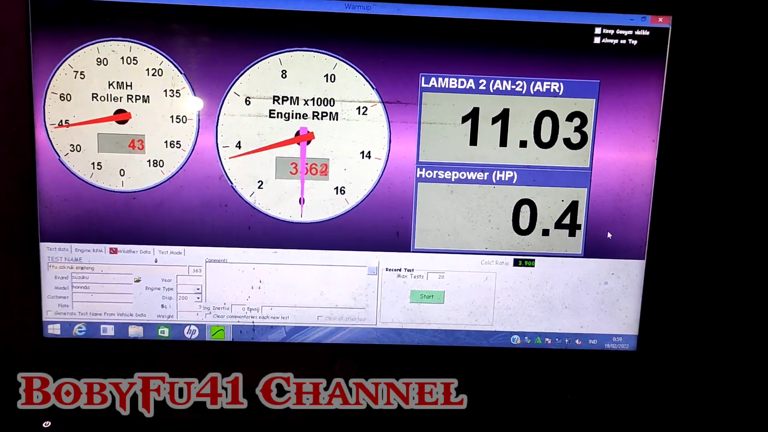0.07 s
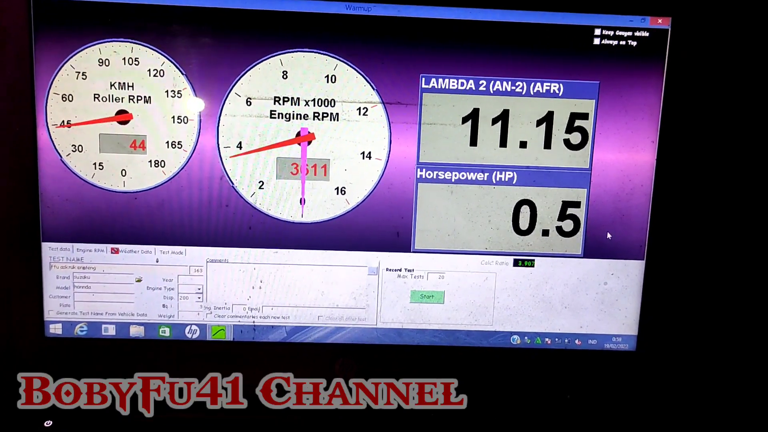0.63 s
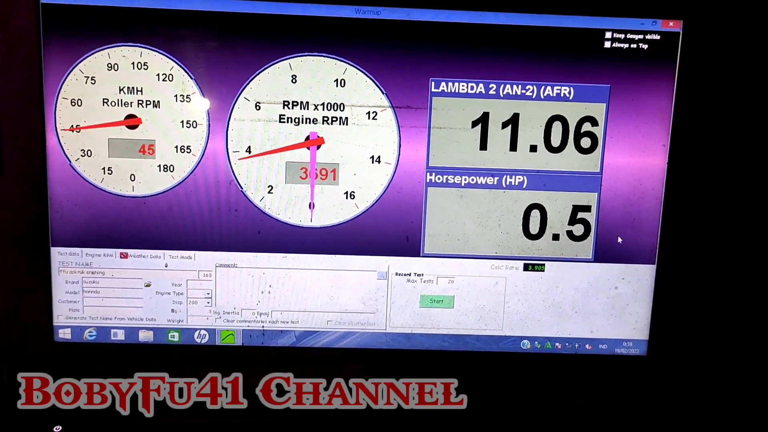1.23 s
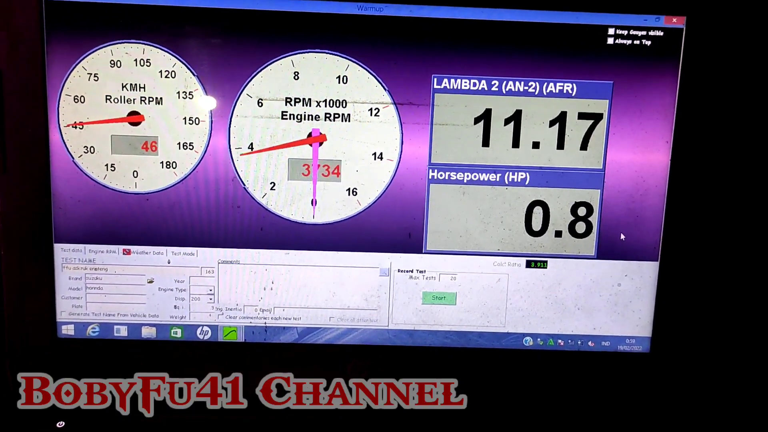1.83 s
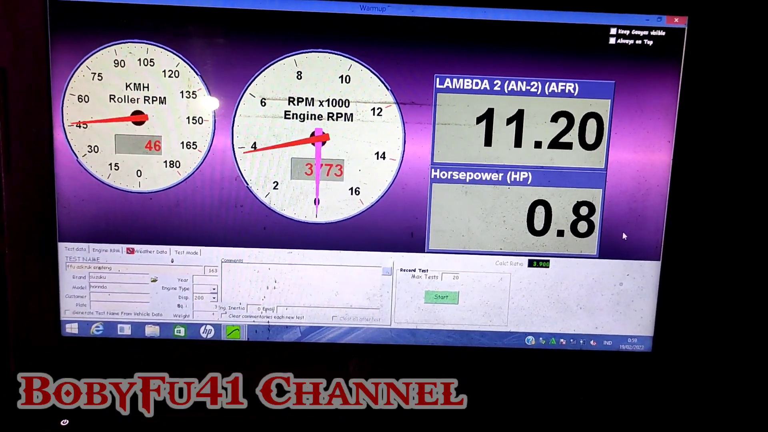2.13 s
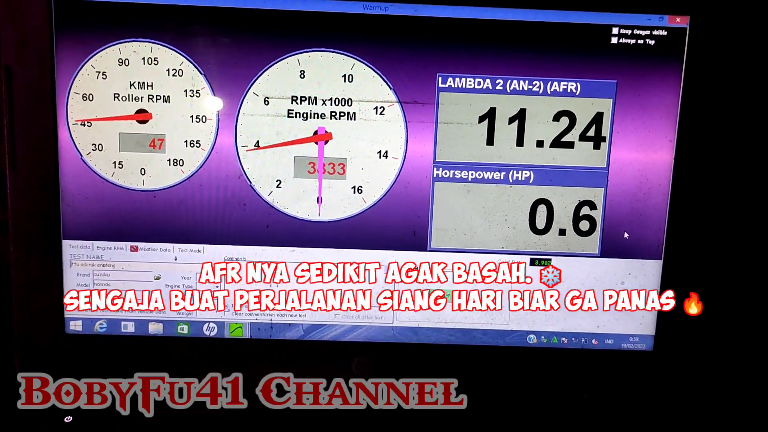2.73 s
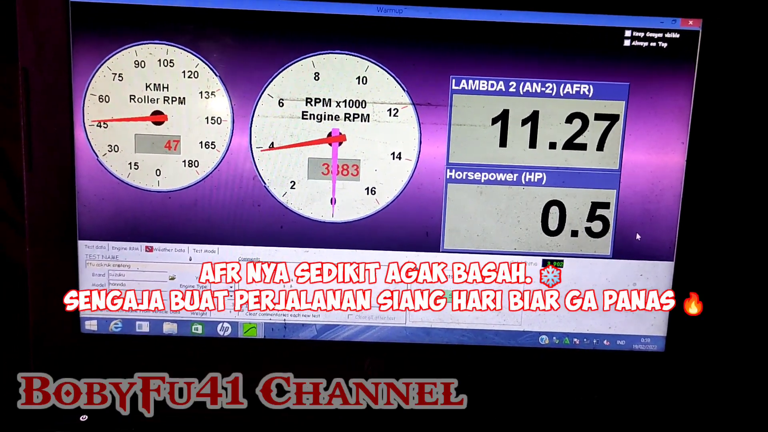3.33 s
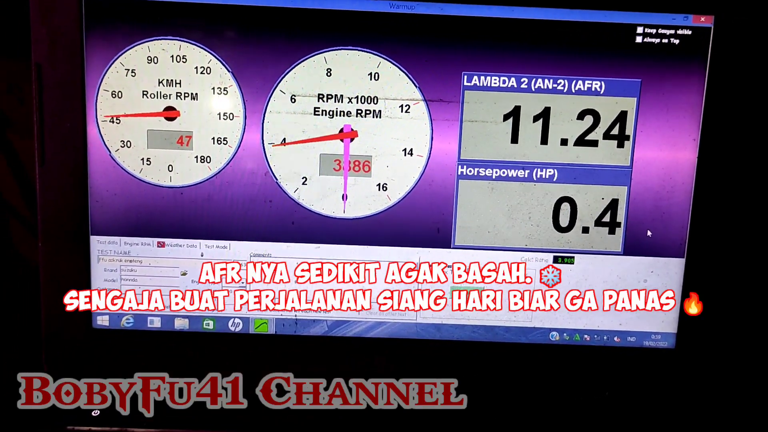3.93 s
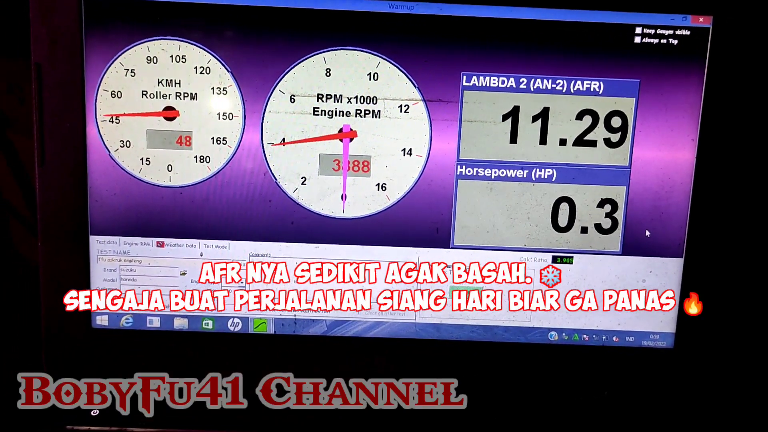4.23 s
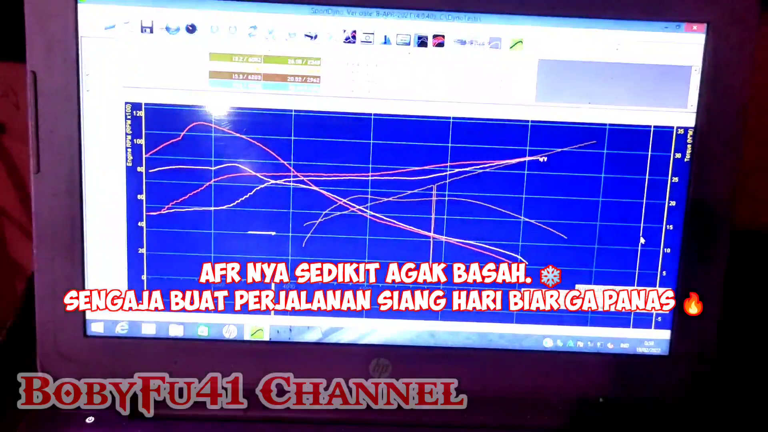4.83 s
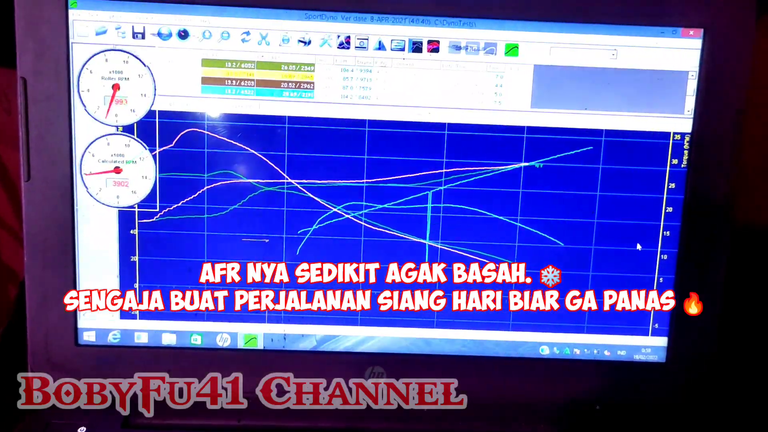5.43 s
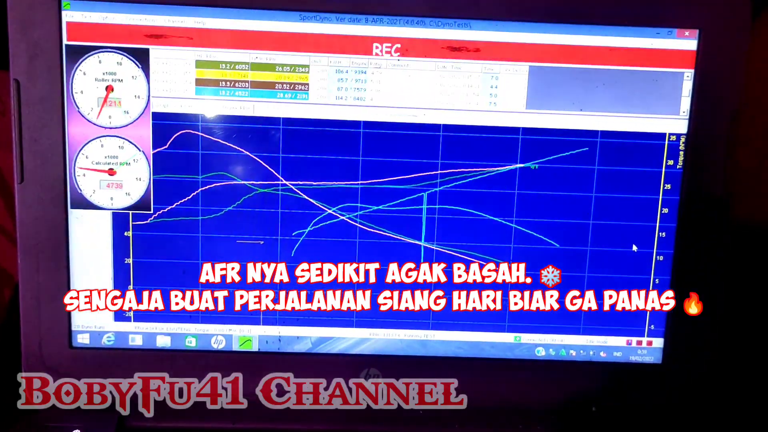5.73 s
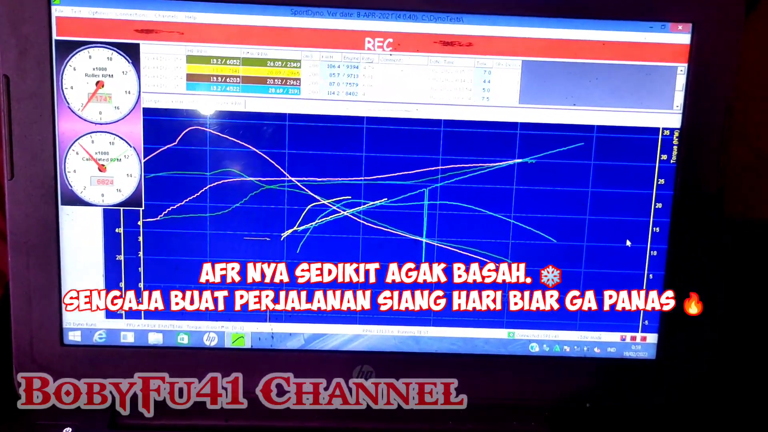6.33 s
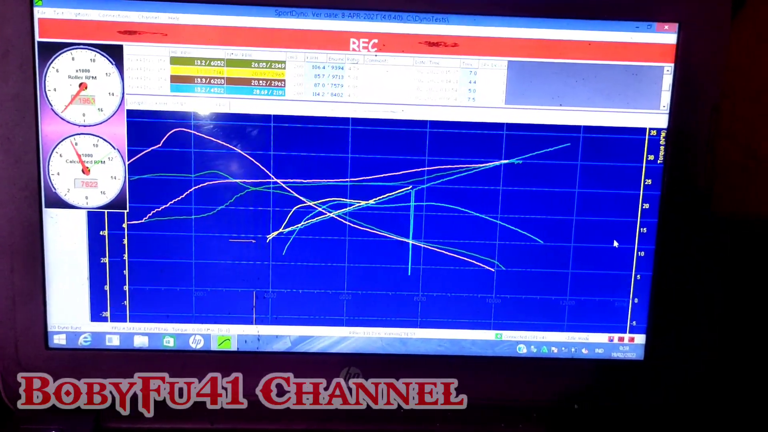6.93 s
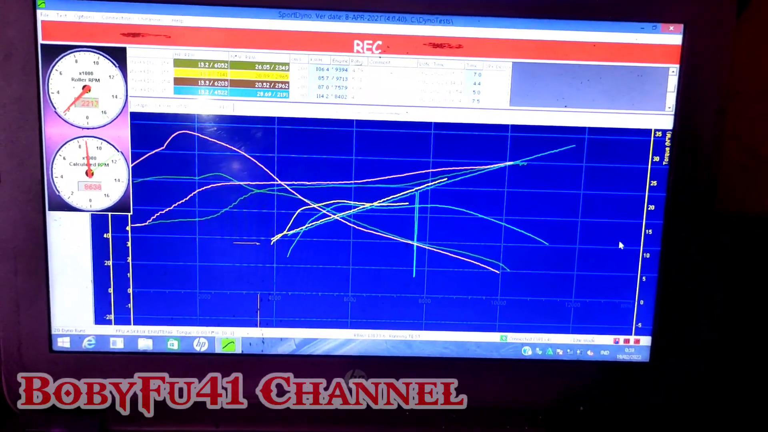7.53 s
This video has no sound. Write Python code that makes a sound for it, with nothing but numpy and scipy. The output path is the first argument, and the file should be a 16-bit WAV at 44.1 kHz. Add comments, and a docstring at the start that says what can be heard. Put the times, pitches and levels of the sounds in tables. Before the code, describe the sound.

Inside a small, boomy workshop, a motorcycle engine cruises on a roller with an even, soft exhaust thud, light ticking and chain noise. About four seconds in it is given full throttle and grows much louder, its revs rising without a break to the end. Air hisses at the intake, gas rasps from the pipe, and the microphone distorts a little on the loud part.

```python
"""Motorcycle on a dynamometer

A single-cylinder four-stroke cruises in a small workshop, then pulls at full throttle.
Each firing sends a pressure pulse and a rush of gas out of the pipe; the harmonics of this
pulse train climb through the fixed resonances of pipe and room. Valves tick, chain, roller
and intake hiss, and the microphone overloads during the pull."""
import sys
import numpy as np
from scipy import signal
from scipy.fft import rfft, irfft
from scipy.io import wavfile

SR = 44100
rng = np.random.default_rng(int(sys.argv[2]) if len(sys.argv) > 2 else 0)


def bounce(signal):
    """Save signal as a 16-bit WAV file at the path given by the first command-line argument."""
    frames = np.transpose(np.atleast_2d(signal))
    limited = np.clip(frames, -1, 1)
    pcm = np.round(limited * 32767).astype(np.int16)
    wavfile.write(sys.argv[1], SR, pcm)


N = 339129
TIME = np.arange(N) / SR
FFT_SIZE = 32768
FREQS = np.maximum(np.fft.rfftfreq(FFT_SIZE, 1 / SR), 1)


def undb(db):
    """Amplitude ratio: a factor of ten for every 20 dB."""
    return 10 ** (np.asarray(db) / 20)


def slope(points):
    """Spectral envelope in dB, interpolated over log frequency."""
    hz, db = np.transpose(points)
    return np.interp(np.log(FREQS), np.log(hz), db)


def resonances(modes):
    """Modal response in dB: each mode adds a Lorentzian peak or dip."""
    return sum(db / (1 + (2 * (FREQS - hz) / width) ** 2) for hz, width, db in modes)


def ring(x, response_db):
    """Minimum-phase filtering: peaks in the response ring on after each pulse."""
    half = FFT_SIZE // 2
    cepstrum = irfft(np.log(undb(response_db)))
    cepstrum[1:half] *= 2
    cepstrum[half + 1:] = 0
    impulse_response = irfft(np.exp(rfft(cepstrum)))[:half]
    return signal.oaconvolve(x, impulse_response)[:N]


def pulses(cycles, phase, jitter_ms, scatter_db):
    """Quasi-periodic impulse train: one click a cycle, varying in timing and size."""
    turns = np.arange(int(cycles[-1])) + phase
    chance = rng.standard_normal((len(turns), 2))
    onset_s = np.interp(turns, cycles, TIME) + chance[:, 0] * jitter_ms / 1000
    size = undb(scatter_db * chance[:, 1])
    place = np.clip(onset_s * SR, 0, N - 2)
    whole, part = place.astype(int), place % 1
    return np.bincount(whole, size * (1 - part), N) + np.bincount(whole + 1, size * part, N)


def walls(x, wet_db, t60_s, above_hz):
    """Reverberation: above the standing waves, dense wall reflections smear each pulse."""
    t = TIME[:SR // 2]
    build_up = 1 - np.exp(-t / 0.0095)
    tail = rng.standard_normal(len(t)) * undb(-60 * t / t60_s) * build_up
    highpass = signal.butter(2, above_hz, "high", fs=SR, output="sos")
    tail = signal.sosfilt(highpass, tail / np.linalg.norm(tail))
    return x + undb(wet_db) * signal.fftconvolve(x, tail)[:N]


# Noise spectrum of chain, tyre and roller: (frequency [Hz], relative level [dB])
ROLLING_SPECTRUM = [(25, -27), (100, -23.5), (400, -24.5), (800, -30), (1200, -38.5), (2500, -35.5),
                    (3300, -41), (4300, -49), (5500, -47), (7300, -43.5)]
def chain_and_roller(cycles):
    """Amplitude modulation: rolling noise swells as the chain is tugged once a crank turn."""
    tug = undb(1.9 * np.sin(4 * np.pi * cycles))
    return ring(rng.standard_normal(N) * tug, slope(ROLLING_SPECTRUM))


# Spectrum of a valve tick: (frequency [Hz], relative level [dB])
TICK_SPECTRUM = [(300, -50.5), (1500, -24.5), (2500, -20.5), (4300, -44), (7000, -36)]
def valves(cycles, level_db, decay_s):
    """Impact noise: valves seat twice a cycle, each in an exponentially decaying burst."""
    impacts = sum(pulses(cycles, phase, jitter_ms=0.3, scatter_db=2.5) for phase in (0.22, 0.56))
    envelope = signal.lfilter([1], [1, -np.exp(-1 / (decay_s * SR))], impacts)
    return undb(level_db) * ring(envelope * rng.standard_normal(N), slope(TICK_SPECTRUM))


def intake(cycles, throttle, hiss_db, centre_hz, width_hz):
    """Flow noise: air hisses past the slide as soon as it lifts, in one gulp a cycle."""
    gulp = 0.5 + np.cos(np.pi * cycles) ** 2
    air = rng.standard_normal(N) * gulp * np.tanh(throttle / 0.16)
    rolloff_db = 20 * np.log10(1 + (2 * (FREQS - centre_hz) / width_hz) ** 2)
    return ring(air, hiss_db - rolloff_db)


# Spectrum of the escaping gas: (frequency [Hz], relative level [dB])
GAS_SPECTRUM = [(30, -12), (120, -23.5), (450, -13.5), (900, -17), (1800, -9), (3000, -12.5), (4500, -20.5),
                (7000, -33)]
def gas_rush(cycles, strength):
    """Turbulence: a rush of gas follows each firing and dies away over the cycle."""
    blowdown = np.exp(-(cycles % 1) / 0.28)
    return ring(rng.standard_normal(N) * blowdown * strength, slope(GAS_SPECTRUM))


# Exhaust pulse on a light throttle: (frequency [Hz], relative level [dB])
THUD_SPECTRUM = [(30, -42), (60, -40.5), (120, -24.5), (250, -34.5), (400, -29), (550, -45), (800, -49.5),
                 (1100, -67.5), (2000, -74.5), (5000, -84.5)]
def thud(cycles, strength):
    """Periodic excitation: soft pressure pulses give mainly low harmonics."""
    firings = pulses(cycles, 0, jitter_ms=0.082, scatter_db=0.7)
    return ring(firings * strength, slope(THUD_SPECTRUM))


# Exhaust pulse on an open throttle: (frequency [Hz], relative level [dB])
BARK_SPECTRUM = [(30, -29.5), (60, -34.5), (120, -18), (250, -23.5), (480, -16), (700, -25.5), (1000, -34),
                 (1800, -35), (3000, -48.5), (5000, -78.5)]
# Colouring of that pulse at high revs: (frequency [Hz], bandwidth [Hz], gain [dB])
HOWL_BANDS = [(207.6, 85, -9), (295, 21, 3), (299, 49, 1.5), (377, 52, -6), (509, 37, 2), (640, 210, -3)]
def bark(hz, cycles, strength, howl_from_hz, howl_full_hz):
    """Sharper pulses carry stronger high harmonics; as the revs climb, boom gives way to howl."""
    firings = pulses(cycles, 0, jitter_ms=0.03, scatter_db=0.8)
    boom = ring(firings * strength, slope(BARK_SPECTRUM))
    howl = ring(boom, resonances(HOWL_BANDS))
    share = np.clip((hz - howl_from_hz) / (howl_full_hz - howl_from_hz), 0, 1)
    return (1 - share) * boom + share * howl


# Workshop standing waves (+) and cancellations (-): (frequency [Hz], bandwidth [Hz], gain [dB])
ROOM_MODES = [(61.83, 6.3, 16), (91.87, 8.6, 17.5), (113.2, 8.3, -12), (126.66, 30, 15.5),
              (157.7, 10.3, -19.5), (182.4, 4.44, -14), (192.8, 44.7, 17), (210.5, 1.9, -13),
              (219.9, 7.6, 13), (244.5, 15, 11), (264.8, 16.1, 18), (290.3, 7.3, -23.5),
              (309.6, 16.4, 10.5), (338, 14, -5.5), (359.7, 28.7, 8.5), (406, 9.8, -6.5), (410.6, 15, 9.5),
              (463, 16.4, 7), (515.4, 17, 6.5), (557, 34, 0), (683, 54, 3), (791, 145, 8)]
# Resonances of pipe and silencer: (frequency [Hz], bandwidth [Hz], gain [dB])
PIPE_MODES = [(311, 150, 2.5), (983, 36, 7), (1214, 33, 3.5), (1690, 31, 3), (1863, 270, 5.5),
              (2157, 63, 2)]
def exhaust(hz, cycles, doublings, throttle, load_lag_s):
    """Source and filter: pulses and gas, growing with speed, excite the modes of pipe and room."""
    lag = np.exp(-1 / (load_lag_s * SR))
    load = signal.lfilter([1 - lag], [1, -lag], throttle)  # combustion builds up behind the throttle
    pulse_size = SR / (2 * hz)  # makes harmonic amplitude independent of the pulse rate
    soft = pulse_size * (1 - load) * undb(-1 + 12 * doublings)
    hard = pulse_size * load * undb(-2 + 4.5 * doublings)
    flow = throttle * undb(-6 + 9 * doublings)
    source = thud(cycles, soft)
    source += bark(hz, cycles, hard, howl_from_hz=37.6, howl_full_hz=58.4)
    source += gas_rush(cycles, flow)
    return ring(source, resonances(PIPE_MODES) + resonances(ROOM_MODES))


def throttle_opening(cruise, twist_at_s, twist_takes_s):
    """Raised-cosine step: the throttle goes from cruise to fully open in one smooth twist."""
    twist = np.clip((TIME - twist_at_s) / twist_takes_s, 0, 1)
    return cruise + (1 - cruise) * np.sin(np.pi / 2 * twist) ** 2


# Engine speed, one firing to two crank turns: (time [s], firing rate [Hz])
FIRING_RATE = [(0.0, 30.2), (0.1, 29.83), (2.25, 31.65), (4.0, 32.42), (4.15, 32.76), (4.39, 36.0),
               (4.6, 37.9), (5.35, 47.67), (5.91, 54.5), (6.83, 66.76), (7.56, 75.66), (7.69, 76.5)]
def scene():
    """Superposition: all sources follow one engine cycle and add up in the workshop."""
    hz = np.interp(TIME, *np.transpose(FIRING_RATE))
    cycles = np.cumsum(hz) / SR
    doublings = np.log2(hz / hz[0])  # octaves above cruising speed
    throttle = throttle_opening(cruise=0.02, twist_at_s=4.097, twist_takes_s=0.16)
    bike = exhaust(hz, cycles, doublings, throttle, load_lag_s=0.36)
    machinery = valves(cycles, level_db=-4.5, decay_s=0.0012) + chain_and_roller(cycles)
    bike += machinery * undb(13 * doublings)
    bike += intake(cycles, throttle, hiss_db=-33.5, centre_hz=7440, width_hz=3300)
    return walls(bike, wet_db=3.5, t60_s=0.2, above_hz=469)[None]


# Microphone response: (frequency [Hz], gain [dB])
MIC_RESPONSE = [(20, -11), (60, 1.5), (4000, -4), (5700, 1), (6000, 6.5), (7450, 7), (7650, -6),
                (8200, -36.5)]
def record(dry, ceiling=0.83, knee=2.93, cutoff_hz=8250):
    """Saturation: the microphone lifts the upper treble, rounds off peaks and cuts the top."""
    coloured = ring(dry[0], slope(MIC_RESPONSE))
    clipped = coloured / (1 + np.abs(coloured / ceiling) ** knee) ** (1 / knee)
    lowpass = signal.ellip(10, 0.1, 80, cutoff_hz, fs=SR, output="sos")
    return signal.sosfilt(lowpass, clipped)[None]


dry = scene()
out = record(dry)
bounce(out)
```